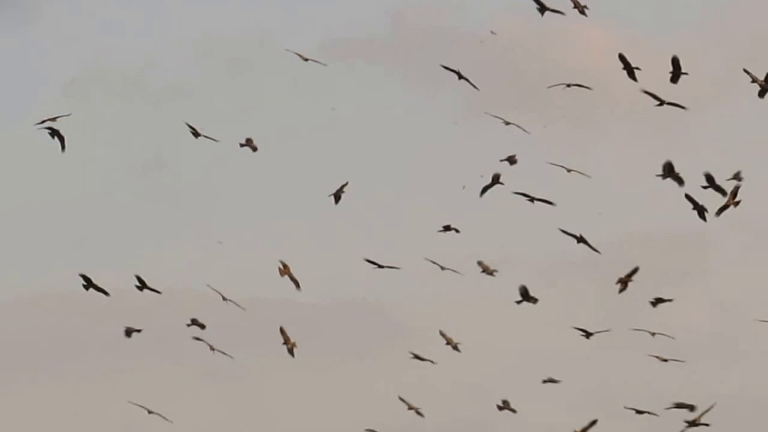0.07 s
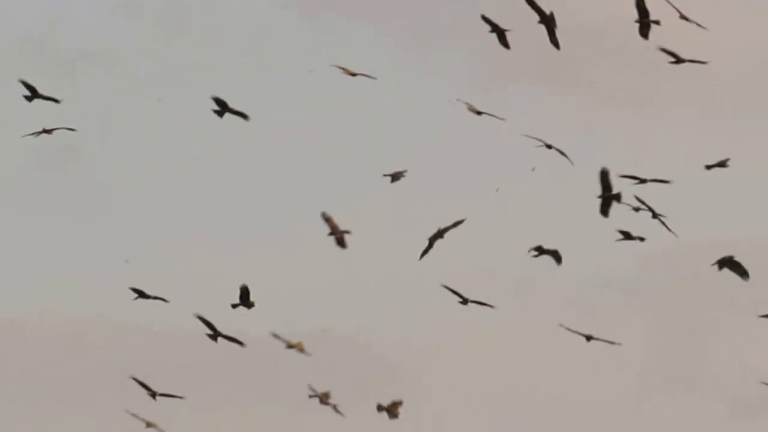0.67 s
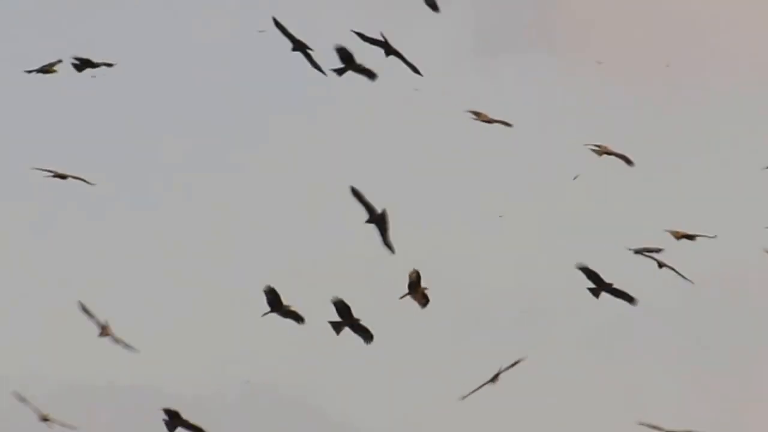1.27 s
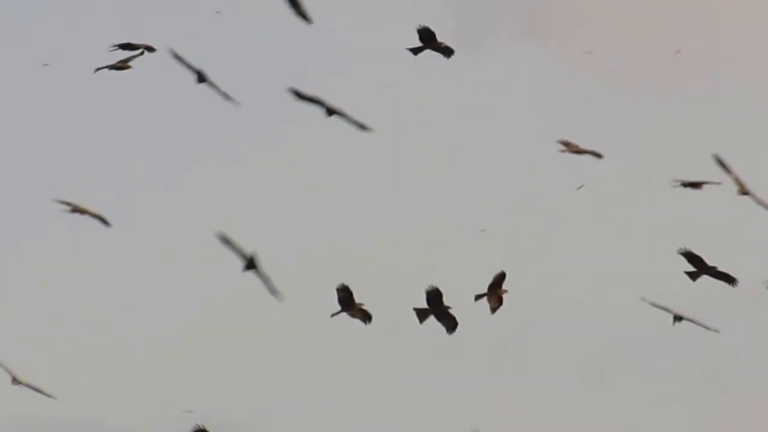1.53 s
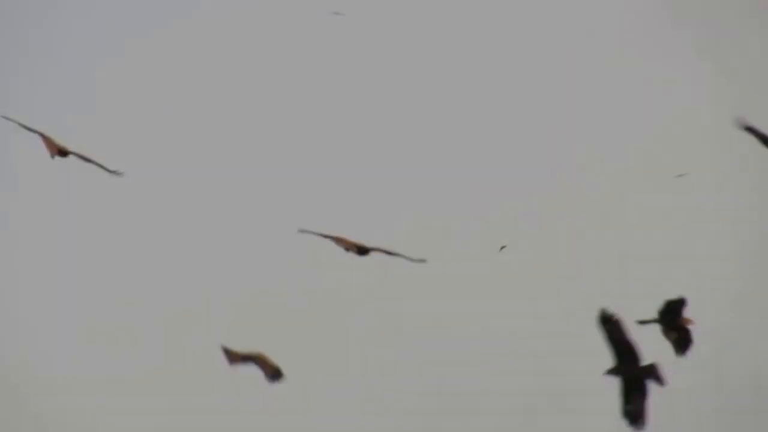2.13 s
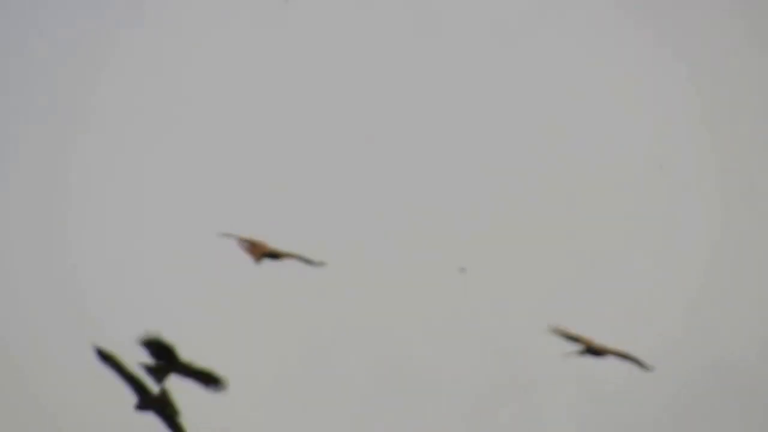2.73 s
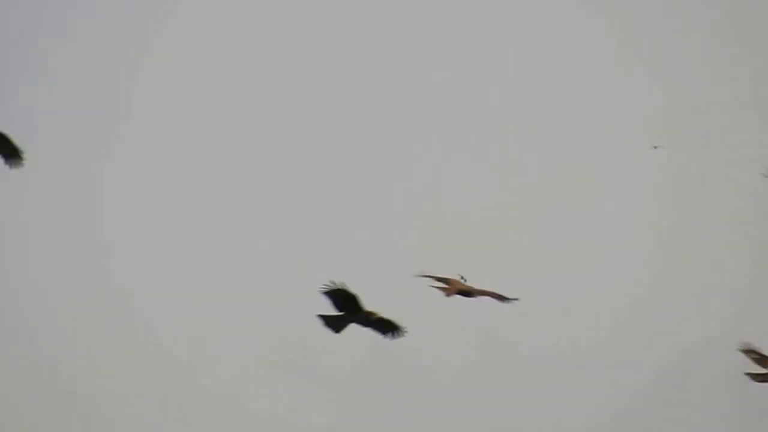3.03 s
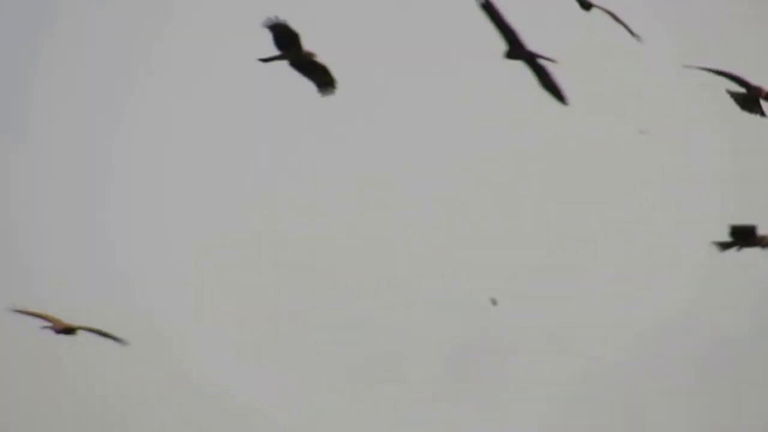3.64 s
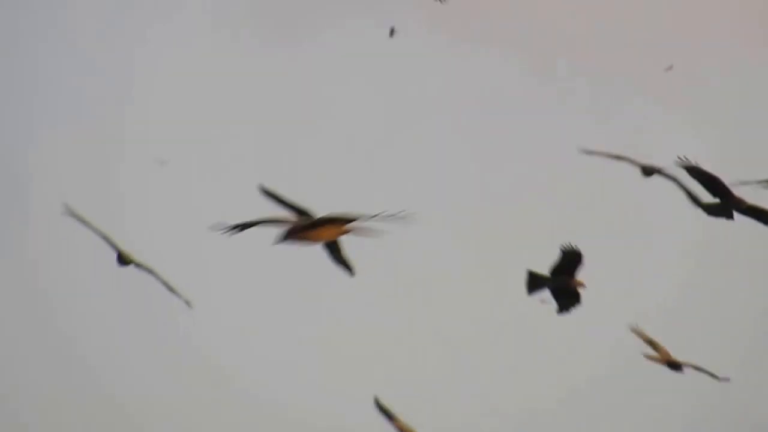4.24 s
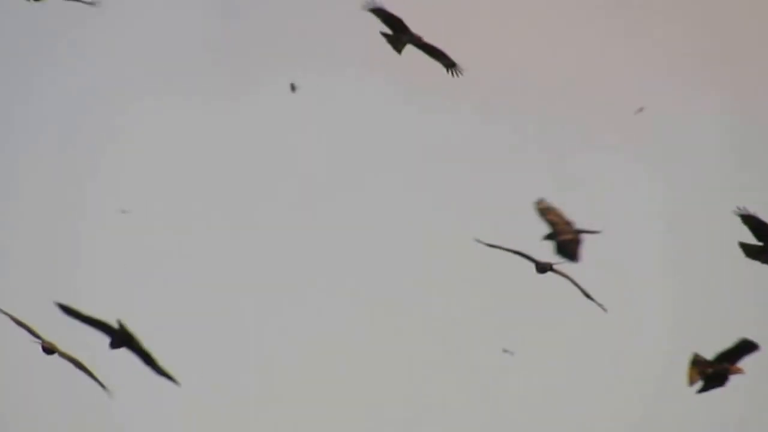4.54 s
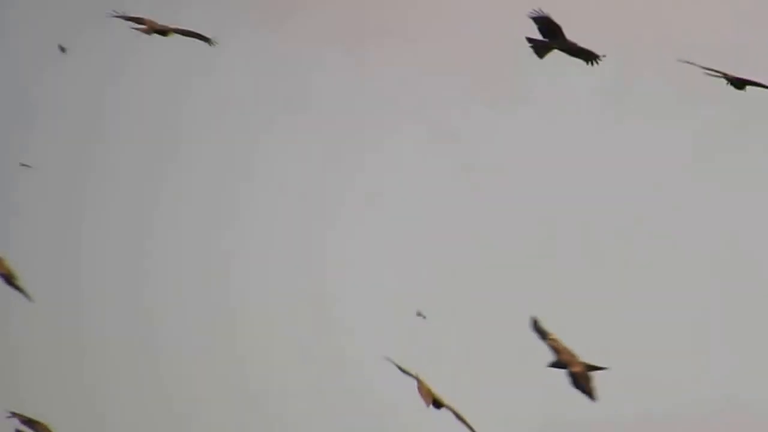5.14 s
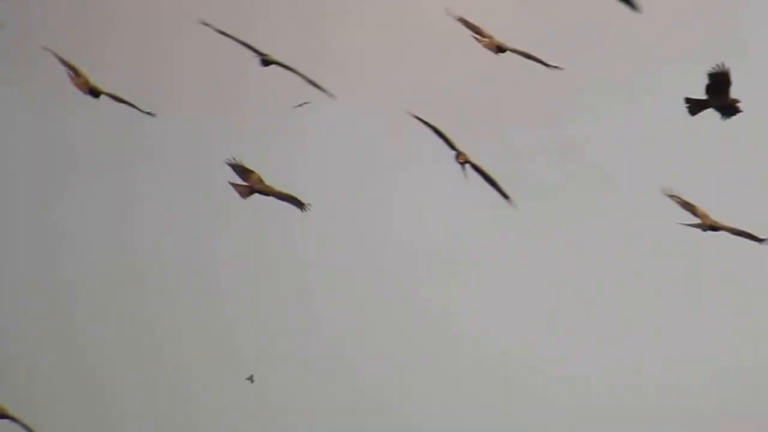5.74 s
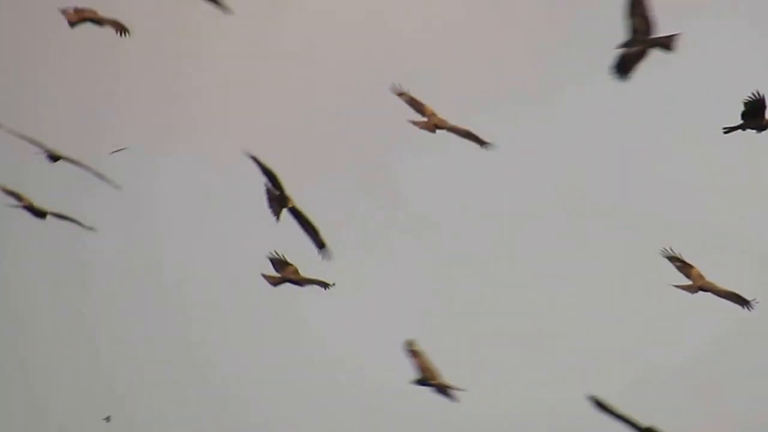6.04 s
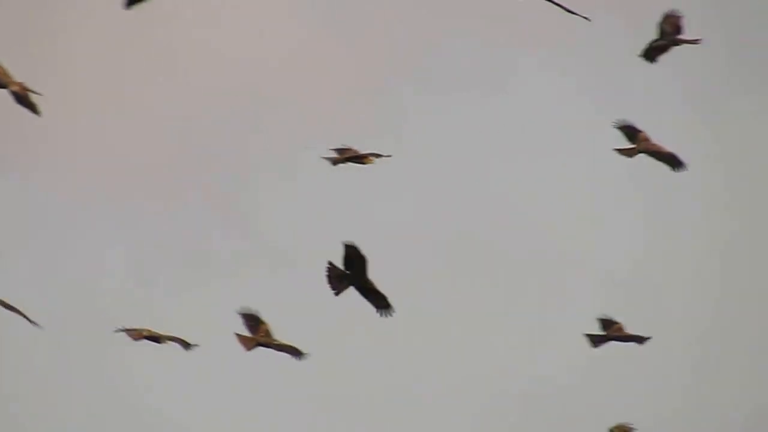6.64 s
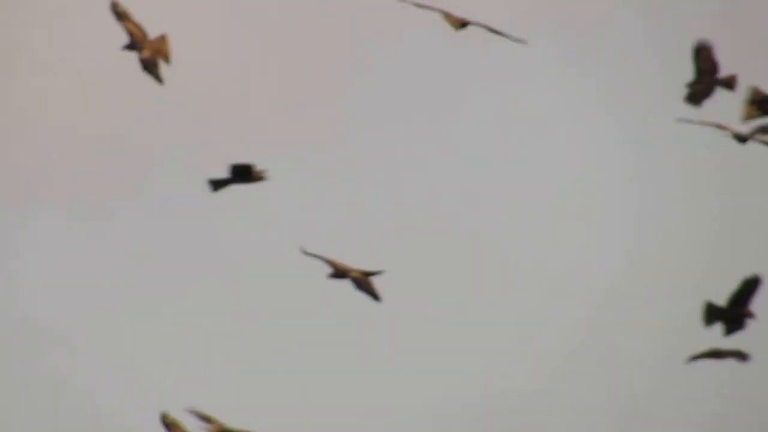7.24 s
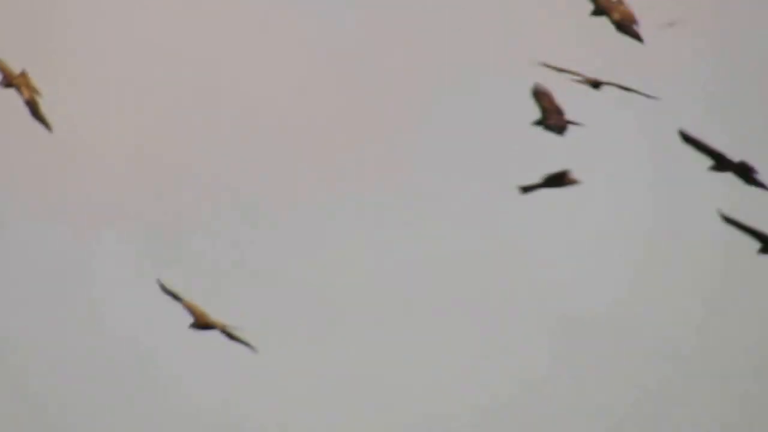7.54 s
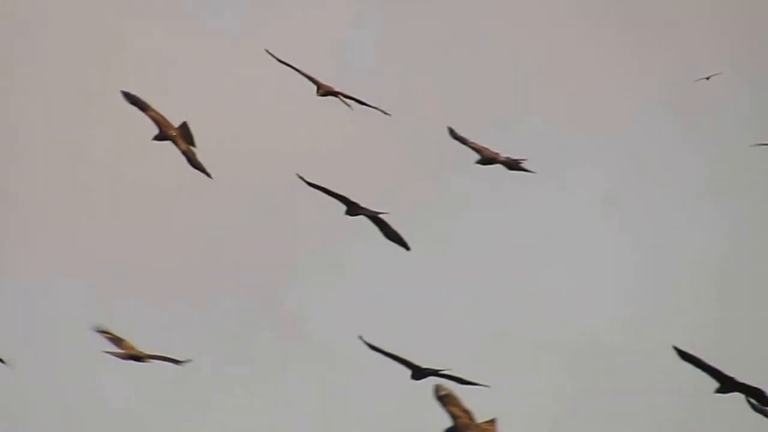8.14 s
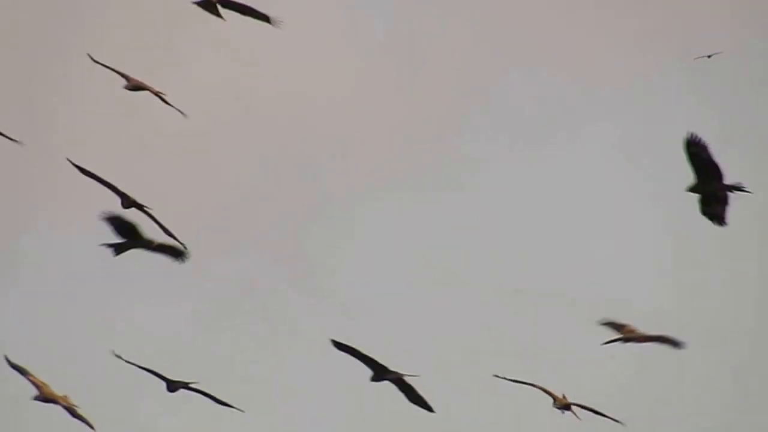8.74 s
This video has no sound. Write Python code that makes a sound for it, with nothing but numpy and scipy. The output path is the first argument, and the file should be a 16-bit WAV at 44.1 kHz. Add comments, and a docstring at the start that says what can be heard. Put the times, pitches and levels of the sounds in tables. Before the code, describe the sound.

Outdoors, wind rumbles and thumps on a hand-held camera's microphone, shifting from side to side. Early on, a faint zoom motor whirrs under the gusts and stops with small clicks. The wind eases in the middle, leaving a wash of distant traffic and a few very faint, thin bird calls. Then it returns with frequent hard thumps, and a light knock and thin rasp come at the end.

```python
"""Outdoors above a distant town, a hand-held camera follows soaring birds. Gusts tumble over its two
microphone ports (openings) and thump on them; after the hardest, the background sinks and creeps back.
The camera widens the stereo by subtracting the ports, so the wind pushes one side as it pulls the other.
Early on the zoom motor whirrs and its lever clicks back; near the end come a knock and a thin rasp.
Behind it all are a few thin bird calls, a wash of traffic and a low throb."""
import sys
import numpy as np
from scipy import signal
from scipy.fft import rfft, irfft
from scipy.io import wavfile
from scipy.ndimage import uniform_filter1d, minimum_filter1d

SR = 44100
rng = np.random.default_rng(int(sys.argv[2]) if len(sys.argv) > 2 else 0)


def wav_out(sig):
    """Save sig, one row per channel (or a flat mono array), as 16-bit PCM at SR to the path in sys.argv[1]."""
    wavfile.write(sys.argv[1], SR, np.round(np.clip(np.atleast_2d(sig).T, -1, 1) * 32767).astype(np.int16))


N = 388080
TIME = np.arange(N) / SR
CUTOFF_HZ = 16000

# Gusts on the ports. Each row: crest time in seconds, length in seconds, relative level in dB,
# corner in Hz (above it the eddies, small whirls of air, die out).
GUSTS = [(0.256, 0.17, -15.5, 102), (0.372, 0.068, -12, 100), (0.497, 0.11, -15.5, 115),
         (0.813, 0.13, -18, 126), (1.263, 0.11, -6, 118), (1.333, 0.023, -11.5, 170),
         (1.448, 0.094, -18, 185), (1.6, 0.27, -17, 120), (1.928, 0.14, -16.5, 127),
         (2.145, 0.098, -12.5, 145), (2.191, 0.12, -11.5, 75), (2.24, 0.083, -9, 194),
         (2.73, 0.093, -13, 140), (2.97, 0.12, -21, 60.7), (3.294, 0.16, -15.5, 123),
         (3.71, 0.13, -20, 104.3), (3.849, 0.063, -15, 118), (3.981, 0.083, -12, 101),
         (4.137, 0.075, -9.5, 125), (4.753, 0.16, -19, 75), (5.432, 0.068, -15.5, 103),
         (6.097, 0.048, -6, 146), (6.207, 0.11, -19, 130), (6.45, 0.15, -13, 135), (6.544, 0.047, -14, 170),
         (6.604, 0.062, -14.5, 138), (6.749, 0.081, -21.5, 200), (6.795, 0.11, -15, 163),
         (6.922, 0.047, -17.5, 125), (7.012, 0.11, -14.5, 150), (7.19, 0.13, -19, 145),
         (7.255, 0.091, -22, 151), (7.34, .05, -20, 125), (7.407, 0.075, -12, 190),
         (7.487, 0.052, -16, 170), (7.652, 0.059, -18.5, 190), (7.726, 0.067, -13.5, 200),
         (7.933, 0.046, -21, 220), (7.999, .035, -14.5, 190), (8.17, 0.053, -15.5, 185),
         (8.29, 0.038, -13.5, 158), (8.406, 0.071, -11, 135), (8.51, 0.11, -12.5, 160),
         (8.648, 0.072, -17, 115), (8.756, 0.043, -10, 195)]
# The breeze between gusts. Each row: time in seconds, relative level in dB, corner in Hz.
BREEZE = [(0, -22.5, 116), (.66, -38.5, 110), (1.12, -15.5, 95), (1.72, -33, 123.3), (2.4, -29.5, 122),
          (4.25, -30.5, 79), (5, -40, 70), (5.85, -39, 110), (6.28, -15, 124), (6.67, -25, 142),
          (7.1, -19.5, 140), (7.35, -19, 143), (7.6, -17, 170), (8.25, -21, 175), (8.7, -28.5, 140),
          (8.8, -23, 149)]
# Which port the wind strikes. Each row: time in seconds, the left port's share of the power from 0 to 1.
LEFT_SHARE = [(0, 0.4), (.6, 0.8), (1.4, 0.84), (1.95, 0.53), (2.2, 0.34), (3.35, 0.04), (3.7, 0.83),
              (4.1, 0.82), (4.7, 0), (5.5, 0.1), (6.2, 1), (8.1, 0.65), (8.5, 0.17), (8.8, 0.37)]
# The hardest single eddies. Each row: time in seconds, relative peak in dB, centre in Hz.
HARD_EDDIES = [(.282, 1, 135), (.375, -9, 110), (.4796, -2.5, 135), (1.3018, 0, 115), (1.325, 4, 255),
               (1.334, -3, 168), (1.9243, -4, 125), (2.1093, -6, 130), (2.1391, -3.5, 169), (2.166, 0, 140),
               (2.175, -3, 241), (2.223, -1, 165), (2.236, -3, 185), (2.247, -11, 160), (2.262, -1.5, 315),
               (2.289, -11.5, 198), (2.7115, -11, 253), (2.728, -6, 175), (3.2774, -8, 139),
               (4.1151, -3, 133), (4.139, -2, 139), (6.097, -8, 140), (6.108, -1, 186), (6.1902, -5, 135),
               (6.361, -1, 166), (6.3951, -3, 154), (6.4275, -2.5, 227), (6.4719, -3.5, 130),
               (6.5035, -6, 255), (6.531, -4, 215), (6.5535, -11, 146), (6.592, -6, 150), (6.739, -8, 188),
               (7.138, -11, 154), (7.178, -4, 130), (7.24, -2.5, 188), (7.2774, -4, 125),
               (7.358, -3.5, 228), (7.398, -4, 224), (7.416, -4.5, 172), (7.426, 1.5, 232),
               (7.489, -5.5, 222), (7.6501, -5.5, 125), (7.71, -4.5, 260), (7.7393, 0, 140),
               (7.7486, -7, 175), (7.7801, -3, 120), (7.866, -5, 215), (7.894, -3, 332), (7.9007, -1, 151),
               (7.9273, -4, 175), (7.941, -4, 240), (7.992, -13, 245), (8.052, 0, 254), (8.1311, -1, 168),
               (8.2838, -10, 160), (8.395, -10, 110), (8.4286, 0, 135), (8.5077, -1, 130),
               (8.5268, -7, 145), (8.546, -5.5, 233.3), (8.627, -13.5, 208), (8.7332, -2, 130),
               (8.748, 0.5, 196.3)]
# Slams, the wind's hardest crests. Each row: time in seconds, relative crack level in dB,
# depth of the background's dip in dB.
SLAMS = [(0.479, -26, 4.5), (1.299, -25, 6), (1.324, -16, 5.5), (1.9243, -21, 1), (2.139, -20, 1),
         (2.165, -21, 6), (2.223, -20, 4.5), (2.237, -22, 3), (2.263, -28, 4), (4.115, -22, 2.5),
         (6.1096, -16, 6.5), (6.362, -20, 1), (6.429, -16, 4), (6.532, -21, 5.5), (7.178, -19, 2),
         (7.242, -22, 3.5), (7.4185, -27, 2.5), (7.4995, -28, 0.5), (7.738, -20.5, 4.5), (8.3955, -26, 2),
         (8.5078, -20.5, 2.5)]
# The zoom motor creeps, runs fast twice, slows and stops. Each row: time in seconds, relative level in dB.
ZOOM_LEVEL = [(0, -55), (1.3, -53.5), (1.57, -58), (1.66, -47), (1.74, -52), (1.78, -46), (1.85, -46),
              (1.9, -42), (1.98, -50), (2.035, -44), (2.13, -46.5), (2.2, -48), (2.44, -51), (2.46, -90.5)]
# The tone of its gears. Each row: frequency in Hz, relative level in dB.
GEAR_SPECTRUM = [(400, -18), (720, 6.5), (1100, 2.5), (1400, 3), (2200, -5), (2950, 1.5), (3900, -8.5),
                 (5000, -4.5), (6300, -10.5), (8850, -9), (9020, -5), (10200, -3), (10700, -4),
                 (11400, -0.5), (12300, -4), (13200, -3), (14700, -22), (16000, -48)]
# The ringing of the lens barrel. Each row: frequency in Hz, width in Hz, boost in dB.
BARREL_PEAKS = [(2830, 140, 5.1), (3360, 90, 3), (9250, 110, 3), (8900, 200, 3), (9900, 110, 4.3),
                (10700, 130, 2), (11370, 100, 3.7), (11400, 110, 3), (12210, 70, 3), (12720, 110, 3),
                (12957, 70, 3)]
# The motor sings as it speeds up and slows down. Each row: start in seconds, length in seconds,
# pitch in Hz, level in dB, fraction by which the pitch sags at the ends.
MOTOR_WHINES = [(1.58, 0.1, 997, -48.5, .002), (2.21, 0.088, 995, -56, .002)]
# Small clicks and knocks on the camera, and one tick of the zoom gears. Each row: start in seconds,
# relative peak in dB, centre in Hz, left minus right in dB, contact time in seconds.
KNOCKS = [(1.4745, -34.5, 6000, -11, 0.00058), (1.476, -46, 2600, -4, 0.00049),
          (1.856, -36, 1900, -4, .001), (2.4318, -46, 10500, -2, .0009), (2.4322, -36.5, 2800, 2, 0.00113),
          (2.4346, -30, 860, -7, 0.0016), (2.4668, -28, 2000, -16, 0.0005),
          (2.4678, -38, 6000, -14, 0.00096), (2.4703, -30, 2160, 7, 0.001), (2.472, -45, 7000, -2, 0.0011),
          (2.469, -40, 750, -5, 0.0011), (8.7333, -28.5, 1150, 5, 0.00141), (8.736, -52, 3150, -4, 0.00091),
          (8.7338, -53, 7900, 0, 0.001)]
# The camera shell's ringing tones. Each row: pitch in Hz, relative level in dB, seconds to fade by 60 dB.
SHELL_TONES = [(640, 0, 0.035), (860, 23, 0.04), (1110, 20, 0.033), (1500, 19.5, 0.024),
               (1954, 19.5, 0.033), (2350, 16.5, 0.02), (2750, 14, 0.022), (3150, 7, 0.044),
               (3640, 0, 0.019), (5720, -1, 0.017), (7400, -6, 0.013), (9700, -4, .014)]
# A rasp in the camera from the last knock on. Each row: time in seconds, relative level in dB.
RASP_LEVEL = [(8.724, -100), (8.73, -58), (8.736, -52), (8.745, -62), (8.8, -58)]
# Its bands of noise. Each row: low edge in Hz, high edge in Hz, relative level in dB.
RASP_BANDS = [(2920, 3260, 3), (3300, 4000, -13), (4700, 4800, -15), (7500, 8300, -8)]
# Far birds. Each row: start in seconds, length in seconds, pitch in Hz, level in dB, sag as a fraction.
BIRD_CALLS = [(3.815, 0.07, 3770, -65, .018), (4.52, .1, 3990, -62, .01), (4.597, 0.1, 5000, -66, .014),
              (5.75, 0.13, 2990, -61, 0.013), (6.03, 0.075, 4980, -64, 0.014), (7.01, .18, 3975, -67, 0)]
# The slow rise and fall of the whole background: traffic, hiss and throb.
# Each row: time in seconds, relative level in dB.
BACKGROUND_LEVEL = [(0, -44.5), (2.6, -41.5), (4.3, -45.5), (5.8, -41), (6.5, -43.5), (7.15, -43.5),
                    (7.6, -46), (8.8, -50)]
# The tone of the traffic and of the hiss. Each row: frequency in Hz, relative level in dB.
TRAFFIC_SPECTRUM = [(30, 16.5), (70, 18), (130, 12.5), (220, 13), (340, 8), (600, 0), (850, -2.5),
                    (1350, -2.5), (1750, -13), (2200, -14), (2550, -19), (3100, -17), (3900, -24.5),
                    (6000, -48)]
HISS_SPECTRUM = [(1500, 4), (3000, -6.5), (4800, 1.5), (7000, 0), (10000, -6), (13000, -8.5), (14500, -16),
                 (16000, -36)]
# How alike the traffic is left and right. Each row: frequency in Hz, likeness (1 means the same).
TRAFFIC_LIKENESS = [(50, 0.15), (130, 0.9872), (290, 0.75), (680, 0.17), (1300, 0.84), (2400, 0.3),
                    (4000, 0.25)]
# Fine peaks and dips in the tone of the traffic and the hiss. Each row: frequency in Hz, width in Hz, boost or
# cut in dB.
FINE_PEAKS = [(262.3, 78, -4.5), (680, 30, -2), (712, 37, 2), (1346, 43, 2.5), (1374, 48, -7.5),
              (1576, 130, 5), (1620, 104, -5.5), (1876, 62, -3.5), (1980, 60, 2.5), (2167, 70, 5),
              (3175, 25, 5.5)]
# The low throb. Each row: pitch in Hz, level in dB above BACKGROUND_LEVEL.
THROB_TONES = [(21.5, 18.5), (48.4, 10.5)]
# Two narrow gaps in the sound, near 4 and 8 kHz. Each row: frequency in Hz, width in Hz.
NARROW_GAPS = [(3945, 200), (7920, 171.9)]


def wind(dip_db, gain_db=2.0, unsteady_db=1.5, crossfeed=0.69, crossfeed_hz=2600):
    """Both ports rumble; the one facing the wind takes the thumps and cracks."""
    level_db, corner_hz = airflow()
    strength = from_db(level_db + gain_db + unsteady_db * drift(12))
    share = np.clip(in_time(LEFT_SHARE)[0], .02, .98)
    facing_left = np.clip(2 * (2 * share - 1) + .5, 0, 1)
    hits = thumps(HARD_EDDIES) + thumps(lesser_eddies(level_db, dip_db)) + cracks()
    left = np.sqrt(share) * strength * turbulence(corner_hz) + facing_left * hits
    right = np.sqrt(1 - share) * strength * turbulence(corner_hz) - (1 - facing_left) * hits
    ports = np.array([left, right])
    # each side is its own port minus some of the other's lower frequencies
    other_lows = signal.lfilter(*signal.butter(1, crossfeed_hz, fs=SR), ports[::-1])
    return ports - crossfeed * other_lows


def airflow():
    """Gusts ride on the breeze and the strongest sets the eddy size: gives level in dB and corner in Hz."""
    breeze_db, breeze_hz = in_time(BREEZE)
    power = from_db(breeze_db) ** 2
    weighted_hz = power * breeze_hz
    for crest, length, db, hz in GUSTS:
        gust = from_db(db) ** 2 * np.exp(-2 * (2 * (TIME - crest) / length) ** 2)
        power += gust
        weighted_hz += gust * hz
    return 10 * np.log10(power), weighted_hz / power


def turbulence(corner_hz, low_share=0.25, steepness=4.21, swirl_db=1.87, lumpy_db=3.0, even_s=0.034):
    """Swirling air rumbles at one port, about two octaves wide, up to a corner that leaps with each swirl."""
    swirl = drift(30)
    top_hz = corner_hz * from_db(swirl_db * np.clip(swirl, -2, 2))
    noise_spectrum = rfft(rng.standard_normal(N))
    bin_hz = np.arange(len(noise_spectrum)) * SR / N
    edges_hz = 20 * 2 ** np.arange(0, 6.5, .5)  # half-octave bands
    rumble = np.zeros(N)
    for low, high in zip(edges_hz, edges_hz[1:]):
        hz = np.sqrt(low * high)
        bass_cut = 1 + (low_share * corner_hz / hz) ** 4
        treble_cut = 1 + (hz / top_hz) ** (2 * steepness)
        noise_band = irfft(noise_spectrum * ((bin_hz >= low) & (bin_hz < high)), N)
        rumble += noise_band / np.sqrt(bass_cut * treble_cut)
    rumble *= from_db(lumpy_db * swirl)
    # even out the level: the airflow sets the strength, the swirls only bunch it up
    power = uniform_filter1d(rumble ** 2, int(even_s * SR))
    power = uniform_filter1d(power, int(even_s * SR / 2))
    return rumble / np.sqrt(power + 1e-12)


def thumps(eddies, order=3, max_count=256):
    """An eddy bursting on a port gives one sharp push and pull."""
    out = np.zeros(N)
    for (at_s, peak_db, hz), turn in zip(eddies, rng.random(max_count)):
        near = slice(max(int(at_s * SR) - SR // 20, 0), int(at_s * SR) + SR // 20)
        spike = (1 - 2j * np.pi * hz * (TIME[near] - at_s) / order) ** -(order + 1)
        out[near] += from_db(peak_db) * np.real(spike * np.exp(2j * np.pi * turn))  # random shape
    return out


def lesser_eddies(level_db, dip_db, top_per_s=7, offset_db=-6, spread_db=5, centre_hz=217, count=200):
    """Random eddies follow the wind's strength and come most often after slams; rows as in HARD_EDDIES."""
    at, chance = rng.integers(0, N, count), rng.random(count)
    strength, size = rng.standard_normal((2, count))
    peak_db = level_db[at] + offset_db + spread_db * strength
    hz = centre_hz * 2 ** (0.095 * size)
    happens = chance < top_per_s * N / SR / count * dip_db[at] / dip_db.max()
    return np.transpose([at / SR, peak_db, hz])[happens]


def cracks(kink_s=0.00025, snap_db=-25.0, snap_s=0.00067):
    """Each slam overloads the port for an instant: a sharp kink in the pressure and a crisp snap above it."""
    kinks, snap_level = np.zeros((2, N))
    for at_s, peak_db, _ in SLAMS:
        near = slice(int(at_s * SR) - SR // 100, int(at_s * SR) + SR // 100)
        apart_s = np.abs(TIME[near] - at_s)
        kinks[near] += from_db(peak_db) * np.exp(-apart_s / kink_s)
        snap_level[near] += from_db(peak_db + snap_db) * np.exp(-apart_s / snap_s)
    snaps = snap_level * rng.standard_normal(N)
    return band(kinks, 500, CUTOFF_HZ) + band(snaps, 3500, CUTOFF_HZ, order=1)


def slam_dips(sink_s=0.0064, recover_s=0.86):
    """How many dB the background sinks: a quick fall at each slam, then a slow return. Dips pile up."""
    dip_db = np.zeros(N)
    for at_s, _, depth_db in SLAMS:
        since = np.maximum(TIME - at_s, 0)
        dip_db += depth_db * np.minimum(since / sink_s, 1) * np.exp(-since / recover_s)
    return dip_db


def zoom_motor(gain_db=7.5, chatter_db=1.1, flutter_db=1.6, sizzle_from_hz=9500, sizzle_rise=0.13):
    """Fine gears whirr through the ringing lens barrel; their sizzle flutters and grows with speed."""
    level_db, = in_time(ZOOM_LEVEL)
    faster_db = np.maximum(level_db - level_db[0], 0)
    whirr = stereo_noise(GEAR_SPECTRUM, [(700, -0.058), (11000, -0.24)], BARREL_PEAKS)
    body = signal.sosfiltfilt(signal.butter(2, sizzle_from_hz, fs=SR, output="sos"), whirr)
    sizzle_db = sizzle_rise * faster_db + flutter_db * drift(14)
    sizzle = (whirr - body) * from_db(sizzle_db) * pan(balance_db=-2)
    return from_db(level_db + gain_db + chatter_db * drift(40)) * (body + sizzle)


def knocks(ring_db=-2.0, crack_db=-7.5, crack_stretch=1.5, gritty=.4, reach_octaves=.5):
    """A tap with a gritty scuff cracks and rings the shell, most strongly near the tap's centre frequency."""
    out, t = np.zeros((2, N)), TIME[:SR // 8]
    for start_s, peak_db, centre_hz, balance_db, contact_s in KNOCKS:
        shell = np.zeros(len(t))
        for hz, db, fade_s in SHELL_TONES:
            distance = np.log2(hz / centre_hz) / reach_octaves
            shell += from_db(db - 60 * t / fade_s) * np.sin(2 * np.pi * hz * t) / (1 + distance ** 2)
        grit = rng.standard_normal(len(t))
        scuff = grit * t * np.exp(-t / contact_s)
        tap = np.arange(len(t)) == int(contact_s * SR)
        ring = signal.fftconvolve(shell, tap + gritty * scuff / np.linalg.norm(scuff))[:len(t)]
        burst = grit * t * np.exp(-t / (crack_stretch * contact_s))
        crack = band(burst, centre_hz / np.sqrt(2), centre_hz * np.sqrt(2))
        knock = from_db(ring_db) * ring / np.abs(ring).max()
        knock += from_db(crack_db) * crack / np.abs(crack).max()
        start = int(start_s * SR)
        out[:, start:start + len(t)] += from_db(peak_db) * knock[:N - start] * pan(balance_db)
    return out


def rasp():
    """Rubbing in the camera makes noise in a few narrow bands."""
    level_db, = in_time(RASP_LEVEL)
    friction = rng.standard_normal((2, N))
    bands = sum(from_db(db) * rms_one(band(friction, low, high)) for low, high, db in RASP_BANDS)
    return from_db(level_db) * bands


def whistles(rows, unsteady):
    """Bird calls or motor whines: short, nearly pure tones whose pitch can sag at both ends."""
    out, waver = np.zeros(N), unsteady * drift(60)
    for start_s, length, hz, level_db, sag in rows:
        near = slice(int(start_s * SR), int((start_s + length) * SR))
        along = np.linspace(-1, 1, len(out[near]))
        pitch_hz = hz * (1 - sag * along ** 2 + waver[near])
        phase = 2 * np.pi * np.cumsum(pitch_hz) / SR
        out[near] += from_db(level_db) * np.sqrt(2 * (1 - along ** 2)) * np.sin(phase)
    return out


def background(traffic_db=12.5, hiss_db=-11.0, waver_db=0.5, throb_waver_db=0.9):
    """Far traffic, an even hiss and a low throb all rise and fall together."""
    level_db, = in_time(BACKGROUND_LEVEL)
    traffic_level = from_db(level_db + traffic_db + waver_db * drift(8))
    traffic = traffic_level * stereo_noise(TRAFFIC_SPECTRUM, TRAFFIC_LIKENESS, FINE_PEAKS)
    hiss = stereo_noise(HISS_SPECTRUM, [(3000, 0.12), (9000, .02)], FINE_PEAKS)
    throb = np.zeros(N)
    for hz, db in THROB_TONES:
        level = from_db(level_db + db + throb_waver_db * drift(7.2))
        throb += level * np.sin(2 * np.pi * hz * TIME + 0.34 * drift(0.63))
    return traffic + from_db(level_db + hiss_db) * hiss + throb * pan(balance_db=6.6)


def stereo_noise(spectrum, likeness, peaks):
    """Noise with a given tone, left-right likeness and narrow peaks or dips, at average level 1."""
    hz = np.arange(N // 2 + 1) * SR / N + 1e-3
    alike = np.clip(at_hz(likeness, hz), -1, 1)
    peaks_db = sum(db / (1 + (2 * (hz - centre) / width) ** 4) for centre, width, db in peaks)
    mid, side = rfft(rng.standard_normal((2, N))) * from_db(at_hz(spectrum, hz) + peaks_db) * (hz > 20)
    shared = np.sqrt(1 + alike) * mid
    opposed = np.sqrt(1 - alike) * side * np.array([[1], [-1]])
    return rms_one(irfft(shared + opposed, N))


def drift(rate_hz):
    """A smooth random wander, about 1 in size."""
    keep = np.exp(-2 * np.pi * rate_hz * 40 / SR)  # one step every 40 samples
    steps = rng.standard_normal(N // 40 + 2002)
    slow = signal.lfilter([1], [1, -2 * keep, keep * keep], steps)[2000:]
    return np.interp(np.arange(N) / 40, np.arange(len(slow)), rms_one(slow))


def band(x, low_hz, high_hz, order=2):
    """Keep what lies between two frequencies."""
    sos = signal.butter(order, [low_hz, min(high_hz, .45 * SR)], "band", fs=SR, output="sos")
    return signal.sosfilt(sos, x + 1e-18)


def from_db(db):
    """Turn decibels into a gain."""
    return 10 ** (np.asarray(db) / 20)


def rms_one(x):
    """Scale to an average (rms) level of 1."""
    return x / np.sqrt(np.mean(x ** 2) + 1e-20)


def in_time(rows):
    """Join a table's points into one curve per column."""
    seconds, *columns = np.transpose(rows)
    return [np.interp(TIME, seconds, column) for column in columns]


def at_hz(points, hz):
    """Read between a table's frequencies, with octaves evenly spaced."""
    table_hz, values = np.transpose(points)
    return np.interp(np.log(hz), np.log(table_hz), values)


def pan(balance_db):
    """Left and right gains; above zero leans left."""
    return from_db(np.array([[.5], [-.5]]) * balance_db)


def scene():
    """Wind in front, then the camera's noises and birds; background and gear whirr sink at each slam."""
    dip_db = slam_dips()
    steady = from_db(-dip_db) * (background() + zoom_motor())
    camera = whistles(MOTOR_WHINES, unsteady=0.00319) + knocks() + rasp()
    birds = whistles(BIRD_CALLS, unsteady=0.0034)
    return wind(dip_db) + steady + camera + birds


def record(dry, ceiling=.98):
    """Two narrow gaps are cut in the sound, a fast limiter holds down big thumps, and the top is cut."""
    out = dry
    for hz, width_hz in NARROW_GAPS:
        out = signal.lfilter(*signal.iirnotch(hz, hz / width_hz, fs=SR), out)
    allowed_gain = ceiling / np.maximum(np.abs(out).max(axis=0), ceiling)
    gain = uniform_filter1d(minimum_filter1d(allowed_gain, size=400), size=400)
    return signal.sosfilt(signal.cheby2(16, 70, CUTOFF_HZ, fs=SR, output="sos"), out * gain)


dry = scene()
out = record(dry)
wav_out(out)
```